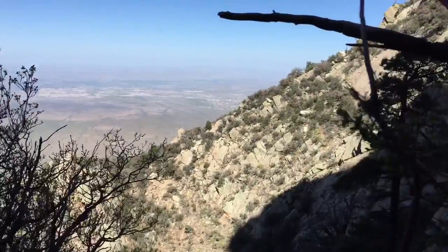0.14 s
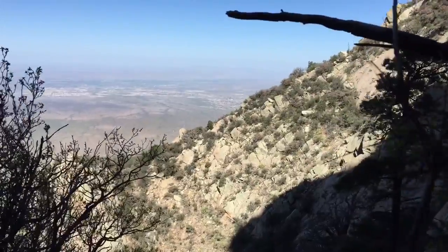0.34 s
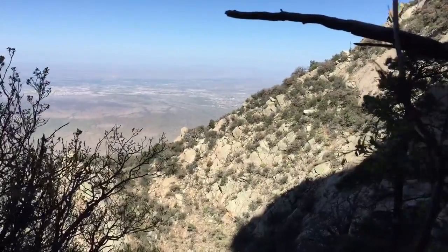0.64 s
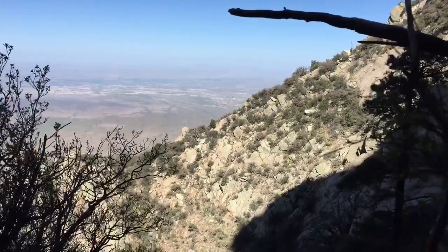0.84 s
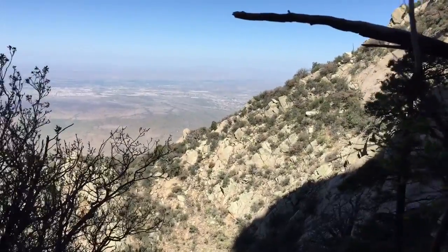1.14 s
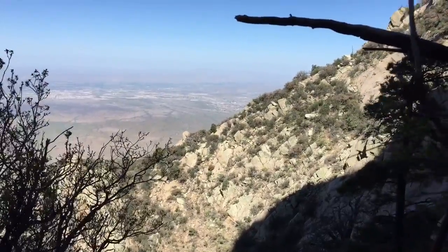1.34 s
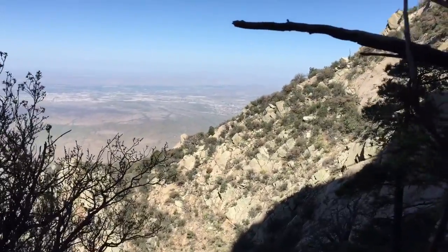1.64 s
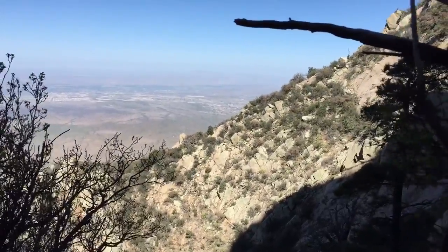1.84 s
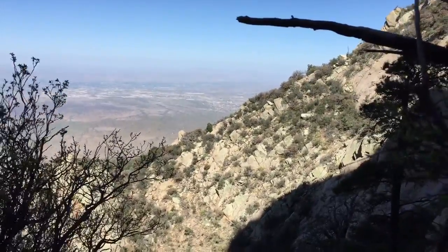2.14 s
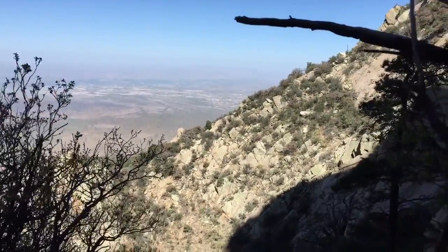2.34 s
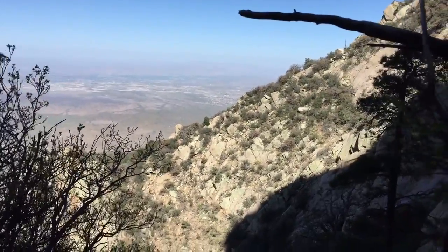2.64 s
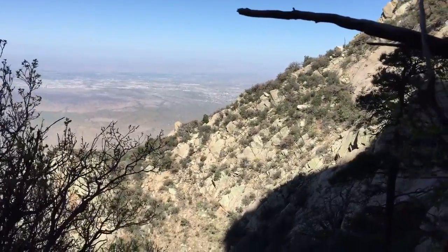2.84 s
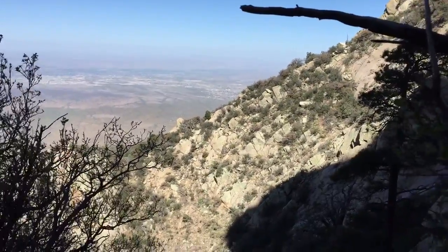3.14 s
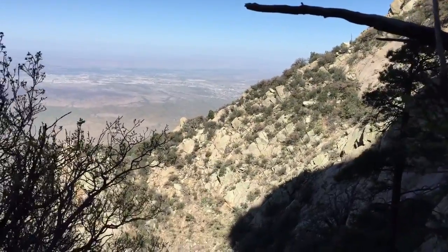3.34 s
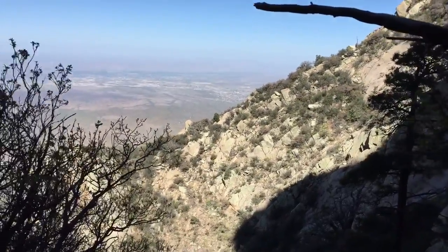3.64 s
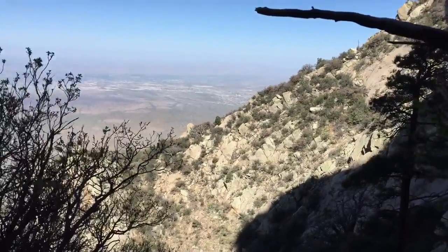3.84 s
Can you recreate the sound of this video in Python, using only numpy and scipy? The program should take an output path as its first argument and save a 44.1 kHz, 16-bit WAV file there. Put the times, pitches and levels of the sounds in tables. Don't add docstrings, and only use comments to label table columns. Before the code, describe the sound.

Wind rumbles directly on a bare phone microphone on an open hillside. Fluttering puffs build from 0.4 seconds to a hard, slapping gust at 0.6-0.76, with sharp twig ticks around 0.43-0.7. Lighter low thumps follow, notably near 1.0, 1.57, 1.77, 2.8 and 3.8. Distant scrub roar gradually dulls beneath faint leaf fizz. Small twigs tick around 2.0-2.8, scrape and squeak near 2.5, and rustle again around 3.6-3.8.

```python
import sys
import numpy as np
from scipy import signal
from scipy.fft import rfft, irfft
from scipy.io import wavfile
from scipy.ndimage import uniform_filter1d

SR = 44100
rng = np.random.default_rng(int(sys.argv[2]) if len(sys.argv) > 2 else 0)


def invert_db(x):
    u = np.asarray(x, float) / 20
    return 10 ** u


def wrap_up_sound(samples):
    columns = np.atleast_2d(samples).T
    tamed = np.clip(columns, -1, 1)
    steps = np.round(tamed * 32767).astype(np.int16)
    wavfile.write(sys.argv[1], SR, steps)


N = 176400

# (time [s], level [dB], brightness [dB per octave])
FAR_ROAR = [(0.0, -55.5, 2.5), (0.61, -52, -2), (0.72, -54, 0.5), (1.69, -57, -3), (1.92, -54, 0.5),
            (2.45, -58, -1.5), (2.62, -59, -3), (2.85, -62, -3.5), (3.33, -60.5, -1), (3.58, -58.5, -2),
            (4.0, -62.5, -3)]
# (frequency [Hz], level [dB])
FAR_ROAR_COLOUR = [(150, -8), (480, -11), (950, -12), (1760, -19.5), (3160, -30), (4900, -43.5),
                   (8000, -51.5), (16000, -59)]
# (time [s], level [dB])
LEAF_FIZZ = [(0, -76.5), (.55, -73), (0.802, -77), (2.5, -78), (2.85, -80), (4, -79.5)]
# (frequency [Hz], level [dB])
LEAF_FIZZ_COLOUR = [(2350, -21.5), (4000, -1), (4900, -5.5), (5700, -3.5), (8940, -11), (10400, -9.5),
                    (15100, -10.5), (15800, -11)]
# (time [s], peak level [dB], ring pitch [Hz])
TWIG_TICKS = [(.0785, -48, 9100), (.184, -55, 5800), (.3067, -46, 13100), (.4258, -36, 5500),
              (.4325, -32.5, 5500), (.4489, -32, 12200), (.4505, -35, 6040), (.4545, -35, 12200),
              (.4812, -30, 9800), (.482, -42, 5400), (.4885, -43, 11500), (.499, -54, 9000),
              (.5501, -50, 9000), (.6345, -31.5, 6500), (.6712, -41, 6000), (.684, -31, 6820),
              (.695, -38, 8000), (1.325, -49, 12000), (1.475, -50, 9000), (1.4436, -51, 13600),
              (1.5657, -46, 10000), (1.647, -44.5, 11700), (1.655, -52, 11700), (1.662, -46, 11700),
              (2.017, -40, 4000), (2.0215, -37, 15000), (2.025, -35, 11600), (2.144, -56, 6500),
              (1.977, -49, 12500), (2.164, -57, 13900), (2.19, -52, 6200), (2.205, -38, 14700),
              (2.207, -36.5, 4180), (2.2401, -41.5, 8000),
              (2.3215, -44, 6200), (2.376, -47, 4000), (2.3839, -55, 13500), (2.3966, -41.5, 7800),
                   (2.411, -54, 8000), (2.451, -55, 13600), (2.471, -40, 2940), (2.498, -48, 6100),
                   (2.526, -36.5, 6230), (2.535, -45, 5030), (2.547, -46, 3800), (2.564, -47, 6240),
                   (2.584, -44, 7200), (2.652, -51, 7000), (2.672, -49, 8260), (2.712, -51, 7800),
                   (2.75, -48, 15300), (2.7556, -44, 3730), (2.777, -48, 3730), (2.97, -51.5, 6400),
                   (3.183, -53, 15000), (3.2, -52, 7000), (3.327, -53, 4160), (3.387, -53, 11600),
                   (3.574, -55, 11400), (3.587, -51, 11400), (3.612, -50, 11600), (3.635, -56.5, 11500),
                   (3.6494, -45, 11600), (3.661, -46, 3820), (3.671, -45, 11200), (3.681, -56, 11400)]
# (start [s], length [s], level [dB], low edge [Hz])
LEAF_SCRAPES = [(.445, 0.077, -65.5, 7000), (1.64, 0.091, -66.5, 3030), (2.02, 0.016, -59.5, 4950),
                (2.19, 0.03, -65, 4470), (2.468, 0.046, -58.5, 2400), (2.512, 0.062, -52, 3200),
                (3.655, .03, -63, 3500), (3.68, 0.044, -59, 1700), (3.78, 0.09, -70.5, 6073),
                (.3, 0.052, -72, 10500), (2.515, .06, -66, 12000), (3.685, .03, -70, 12500),
                (.15, 0.08, -71, 10500), (1.07, 0.087, -74, 10500)]
# (start [s], length [s], level [dB], pitch [Hz])
TWIG_SQUEAKS = [
    (1.67, 0.039, -73, 2050),
    (2.003, .016, -72, 2100),
    (2.478, 0.038, -67, 2030),
    (2.522, 0.033, -57.5, 2050),
    (3.797, .058, -61.5, 2040),
]
# (multiple of the pitch, level [dB])
SQUEAK_OVERTONES = [(1, 0.5), (2, -2), (3, 4.5), (4, -16)]
# (centre [s], length [s], level [dB],
# swirl fineness [Hz])
WIND_PUFFS = [(.03, 0.13, -27, 196), (0.083, 0.12, -23.5, 246), (0.124, 0.033, -26.5, 207),
              (0.167, 0.12, -26.5, 168), (0.23, 0.073, -25, 143), (0.323, 0.11, -29, 122),
              (0.398, 0.014, -21, 197), (0.453, 0.038, -18, 135), (0.535, 0.044, -18.5, 139),
              (0.585, 0.027, -16, 255), (0.626, 0.03, -12, 283), (0.667, 0.016, -11, 272.5),
              (0.704, 0.015, -10, 336), (0.742, 0.03, -13.5, 310.6), (0.81, 0.019, -17, 138),
              (0.871, 0.054, -33, 92), (0.954, 0.034, -31, 80.5), (1.004, 0.024, -18, 50),
              (1.066, 0.072, -24, 90), (1.179, 0.016, -22.5, 120.4), (1.243, 0.02, -22.5, 91.3),
              (1.314, 0.13, -35, 73), (1.418, 0.048, -32, 117), (1.511, 0.072, -25.5, 115.2),
              (1.565, 0.031, -19, 124.5), (1.722, 0.022, -26.5, 101), (1.773, 0.037, -19, 160.4),
               (1.82, 0.014, -30, 69), (1.959, 0.02, -25, 115), (2.001, 0.049, -25.5, 102),
               (2.033, 0.06, -27, 115), (2.129, 0.023, -29.5, 101.4), (2.235, 0.036, -24, 128.8),
               (2.326, 0.028, -29, 79), (2.384, 0.018, -33, 70), (2.459, 0.031, -32, 127),
               (2.537, 0.09, -31, 110), (2.67, 0.097, -24.5, 90.5), (2.802, 0.026, -18.5, 127),
               (2.936, 0.037, -27.5, 98.3), (3.024, 0.057, -29.5, 125), (3.12, 0.24, -32.5, 67.4),
               (3.217, 0.011, -30.5, 132), (3.258, 0.058, -22.5, 115), (3.417, 0.11, -33.5, 78.8),
               (3.516, 0.048, -23.5, 119), (3.6, 0.13, -31, 66.5), (3.756, 0.048, -24.5, 103),
               (3.808, 0.015, -21, 138.9), (3.864, 0.058, -25.5, 91), (3.954, 0.041, -23.5, 122)]
# (time [s], peak level [dB], wobble pitch [Hz])
EDDY_SLAPS = [(.076, -25, 505), (.118, -23, 463), (.394, -30.5, 458), (.574, -26, 503), (.594, -18, 623),
              (.617, -21, 540), (.626, -19.5, 645), (.634, -18.5, 707), (.658, -12.5, 643), (.694, -9, 380),
              (.698, -11, 744), (.708, -18, 750), (.717, -20.5, 905), (.724, -18, 660), (.735, -20.5, 750),
              (.745, -16, 607), (.758, -21, 596), (.812, -42, 402), (1.561, -24.5, 390),
              (1.766, -24.5, 397), (1.785, -28, 392), (2.797, -27, 381), (2.81, -40, 382),
              (3.51, -34.5, 343), (3.811, -35, 300), (3.97, -31, 343)]


def read(points, at, scale=np.log1p):
    x, value = np.transpose(points)
    return np.interp(scale(at), scale(x), value)


def evened(x):
    return x / np.sqrt(np.mean(x ** 2) + 1e-20)


def add(mix, start_s, sound):
    at = round(start_s * SR)
    sound = sound[max(-at, 0):]
    part = mix[max(at, 0):][:len(sound)]
    part += sound[:len(part)]


def colour(x, gain):
    hz = np.fft.rfftfreq(len(x), 1 / SR)
    return irfft(rfft(x) * gain(hz), len(x))


def clicks(size, per_s, spread_db, push_share=1.0):
    when, sign, big = rng.random((3, size))
    height = invert_db(-spread_db * np.log(big + 0.014))
    return (when < per_s / SR) * np.where(sign < push_share, 1, -1) * height


def mottled(x):
    bumps = np.transpose([np.linspace(0, SR / 2, num=60), rng.standard_normal(60)])
    return colour(x, lambda f: invert_db(3.5 * read(bumps, f, np.asarray)))


def wash(level, spectrum, lo_hz, hi_hz, patchy_db):
    hz = np.fft.rfftfreq(512, 1 / SR)
    t = np.arange(N // 128 + 5) * 128 / SR
    a, b, patches = rng.standard_normal((len(t), len(hz), 3)).T
    patches = uniform_filter1d(patches, size=3, axis=0)
    patches = evened(uniform_filter1d(patches, size=36, axis=1))
    shape = invert_db(read(spectrum, hz))
    z = (a + 1j * b) * shape[:, None] * invert_db(patchy_db * patches)
    rms = np.sqrt(np.mean(signal.istft(z, nperseg=512, noverlap=384)[1] ** 2))
    in_band = (hz > lo_hz) & (hz < hi_hz)
    share = np.sum(shape[in_band] ** 2) / np.sum(shape ** 2)
    s, db, tilt_db = np.transpose(level)
    octaves = np.clip(np.log2((hz + 1) / 1500), -1, 2)[:, None]
    z = z * invert_db(np.interp(t, s, db) + octaves * np.interp(t, s, tilt_db))
    return signal.istft(z, nperseg=512, noverlap=384)[1][:N] / rms / np.sqrt(share)


def far_roar():
    return wash(FAR_ROAR, FAR_ROAR_COLOUR, 1000, 3500, patchy_db=1.5)


def leaf_fizz():
    untilted = [(s, db, 0) for s, db in LEAF_FIZZ]
    return wash(untilted, LEAF_FIZZ_COLOUR, 6600, 18300, patchy_db=1.8)


def leaf_crackle():
    taps_per_s, spread_db, ring_t60_s, below_fizz_db = 900, 4.5, 0.0027, -9
    out, t = np.zeros(N), np.arange(200) / SR
    clump = invert_db(5.0 * evened(colour(rng.standard_normal(N), lambda f: f < 15)))
    for hz in np.geomspace(4000, 15000, num=12):
        grain = np.sin(2 * np.pi * hz * t) * invert_db(-60 * t / ring_t60_s)
        out += signal.oaconvolve(clicks(N, taps_per_s / 12, spread_db), grain)[:N]
    return evened(out * clump) * invert_db(below_fizz_db + read(LEAF_FIZZ, np.arange(N) / SR, np.asarray))


def twig_tick(s, db, hz):
    ring_t60_s, snap_t60_s, litter_t60_s, rise_s = 0.013, 0.0057, 0.034, .0012
    side_ring_db, litter_db = -14, -21
    t = np.arange(3000) / SR
    side_hz = rng.uniform(5500, 13000, 3)
    snap, litter = map(mottled, np.diff(rng.standard_normal((2, len(t) + 1))))

    low_hz, top_hz = min(0.72 * hz, 6000), 1.3 * hz
    snap = colour(snap, lambda f: f ** 6 / (f ** 6 + low_hz ** 6) / (f + low_hz) / (1 + (f / top_hz) ** 2))
    snap = evened(snap) * invert_db(-60 * t / snap_t60_s)
    side_rings = np.sin(2 * np.pi * side_hz[:, None] * t).sum(0)
    ring = np.sin(2 * np.pi * hz * t) + invert_db(side_ring_db) * side_rings
    ring = ring * invert_db(-60 * t / ring_t60_s * max(hz / 6500, 1))
    litter = evened(colour(litter, lambda f: 1 / (1 + ((f - hz) / 2000) ** 2)))

    x = ring + snap
    x = x / abs(x).max() + litter * invert_db(litter_db - 60 * t / litter_t60_s)
    return s, invert_db(db) * x * np.minimum(t / rise_s, 1)


def leaf_scrape(s, length, db, low_hz):
    slips_per_s, spread_db, rub = 1500, 3.5, .3
    size = round(length * SR)
    slips = clicks(size, slips_per_s, spread_db) + rub * rng.standard_normal(size)
    slips = signal.lfilter([1], [1, -.6], slips)
    body = colour(mottled(slips), lambda f: (f / low_hz) ** 3 / (1 + (f / low_hz) ** 5.0))
    return s, invert_db(db) * evened(body) * signal.windows.hann(len(body)) ** 0.38


def twig_squeak(s, length, db, hz):
    flutter_hz = 200
    t = np.arange(round(length * SR)) / SR
    out = 0
    for multiple, part_db in SQUEAK_OVERTONES:
        noise = rng.standard_normal((2, len(t)))
        a, b = (evened(colour(v, lambda f: np.exp(-f / flutter_hz))) for v in noise)
        tone = np.exp(2j * np.pi * multiple * hz * t)
        out = out + invert_db(part_db) * ((0.71 + a + 1j * b) * tone).real
    return s, invert_db(db) * evened(out) * signal.windows.tukey(len(t), .3)


def eddy_slap(s, db, hz):
    span_s, cycles = .003, .7
    t = (np.arange(2048) - 1024) / SR
    bell = np.exp(-(t * hz * 2 / cycles) ** 2) + np.exp(-(t / span_s) ** 2) / 4
    return s + t[0], invert_db(db) * np.cos(2 * np.pi * (hz * t + rng.random())) * bell


def eddies(swell, fine_hz):
    per_cycle, spread_db, push_share = 3.0, 2.5, .55
    port_hz, port_damp, tail_db, bass_share = 51.1, 0.52, -7.5, 0.5
    train = swell * clicks(len(swell), per_cycle * fine_hz, spread_db, push_share)
    knee_hz = 162.8 * (fine_hz / 100) ** 0.66

    def gain(f):
        bump = np.exp(-(f / knee_hz) ** 2) + invert_db(tail_db) * np.exp(-f / fine_hz)
        s = 1j * f / port_hz
        port = (s ** 2 / (s ** 2 + 2 * port_damp * s + 1)) ** 3
        return bump * port * f / (f + bass_share * fine_hz)

    return colour(train, gain)


def wind_buffet():
    breeze_db, breeze_hz, slowing, lag = -44, 59.8, 1.25, 0.17
    out = invert_db(breeze_db) * evened(eddies(np.ones(N), breeze_hz))
    t = (np.arange(16384) - 8192) / SR
    fade = signal.windows.hann(len(t)) ** .5
    for centre, length, db, fine_hz in WIND_PUFFS:
        puff = 0
        for side in (1, -1):
            swell = np.exp(-2 * (t / length + side * lag) ** 2)
            puff = puff + evened(eddies(swell, fine_hz * slowing ** side))
        strength = invert_db(db) * np.sqrt(length / (2 * -t[0]))
        add(out, centre + t[0], strength * evened(puff * fade))
    return out


def scene():
    mix = far_roar() + leaf_fizz() + leaf_crackle() + wind_buffet()
    events = ((TWIG_TICKS, twig_tick), (LEAF_SCRAPES, leaf_scrape),
              (TWIG_SQUEAKS, twig_squeak), (EDDY_SLAPS, eddy_slap))
    for rows, maker in events:
        for row in rows:
            add(mix, *maker(*row))
    return mix[None]


def low_pass(x):
    return signal.sosfilt(signal.butter(12, 16160, fs=SR, output="sos"), x)


def record(dry):
    edge_hz, notch_hz, notch_db, notch_width_hz = 15800, 10500, -5, 370

    def response(f):
        top_limit = np.clip((edge_hz - f) / 120 + .5, 0, 1)
        return top_limit * invert_db(notch_db * np.exp(-((f - notch_hz) / notch_width_hz) ** 2))

    mic = colour(dry[0], response)
    return low_pass(np.tanh(mic)[None])


dry = scene()
out = record(dry)
wrap_up_sound(out)
```